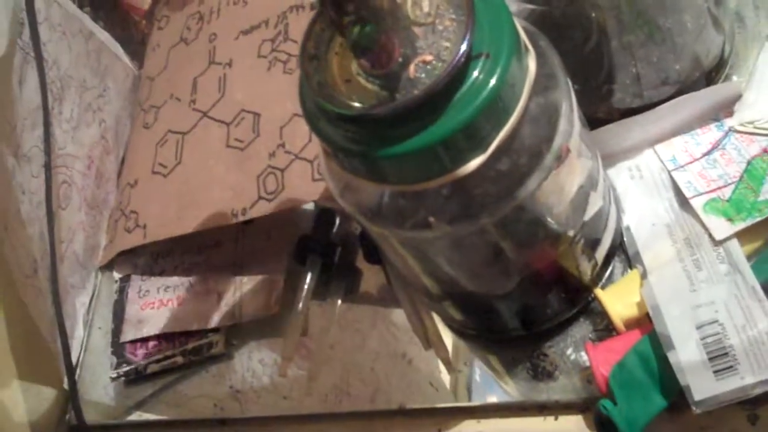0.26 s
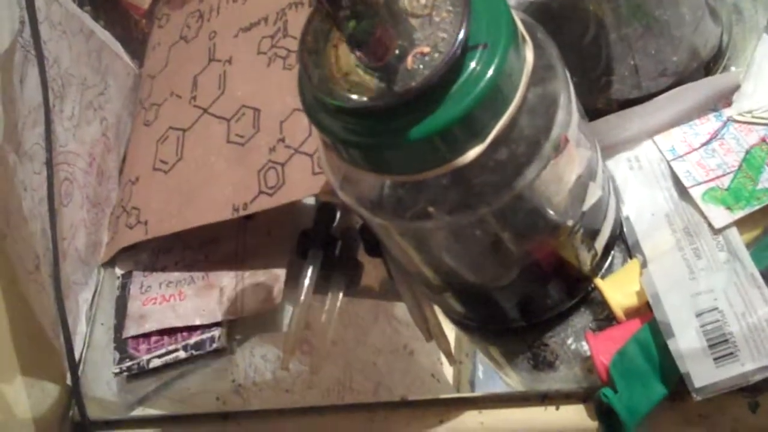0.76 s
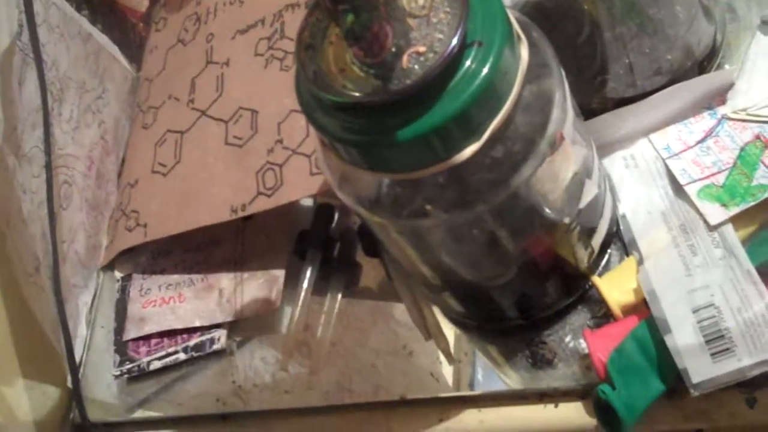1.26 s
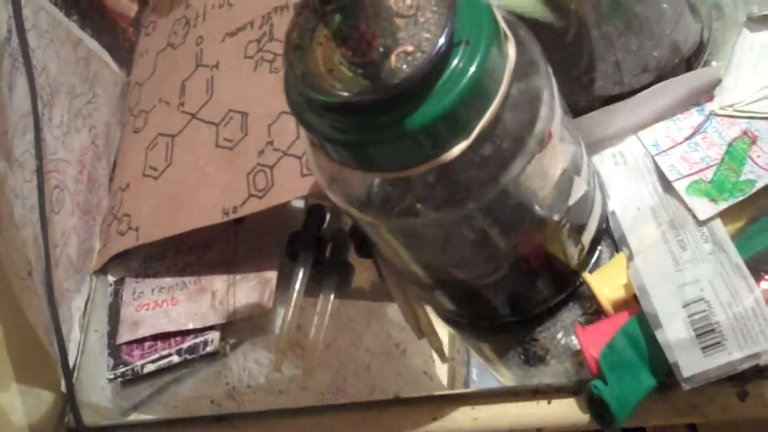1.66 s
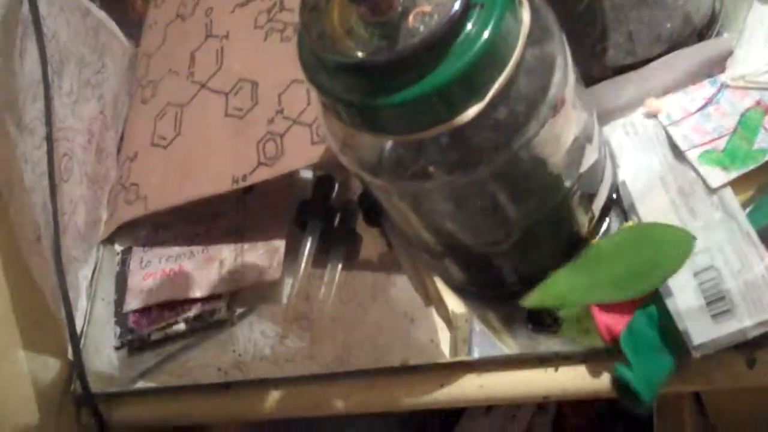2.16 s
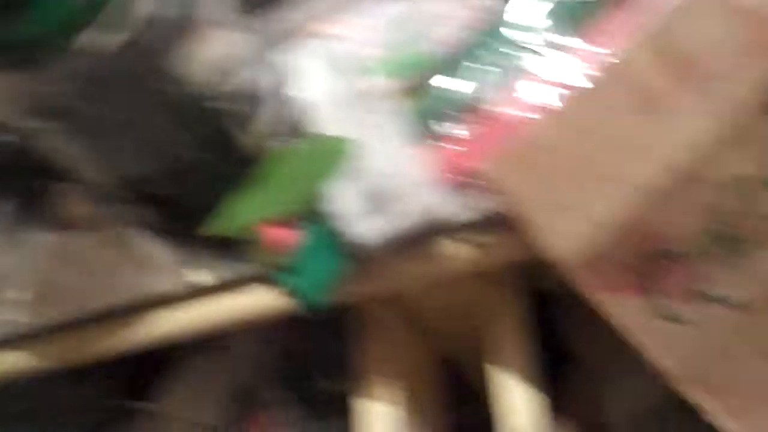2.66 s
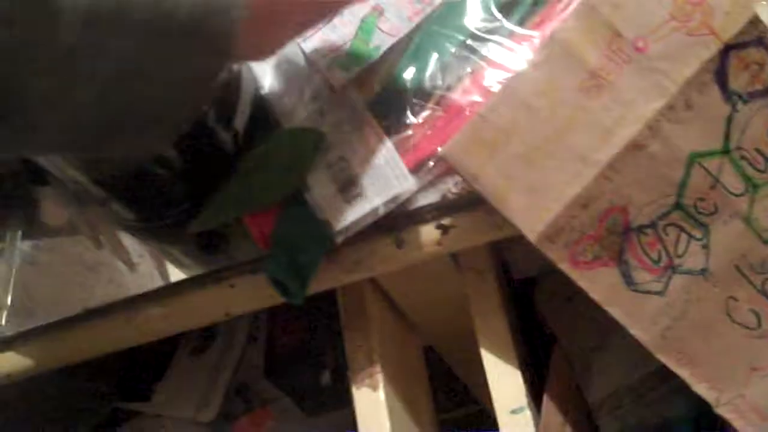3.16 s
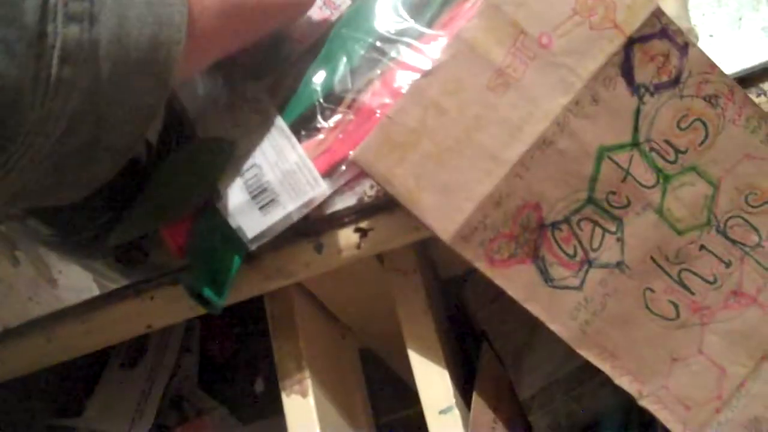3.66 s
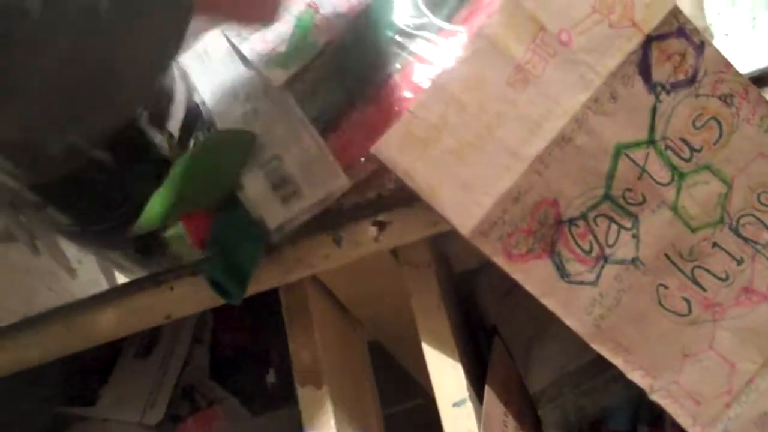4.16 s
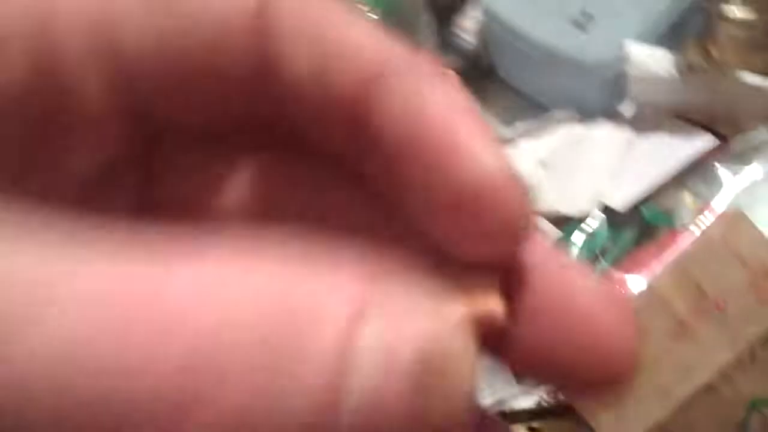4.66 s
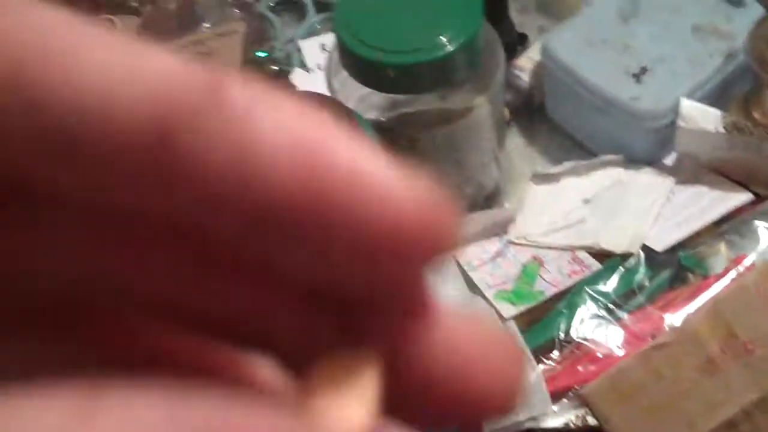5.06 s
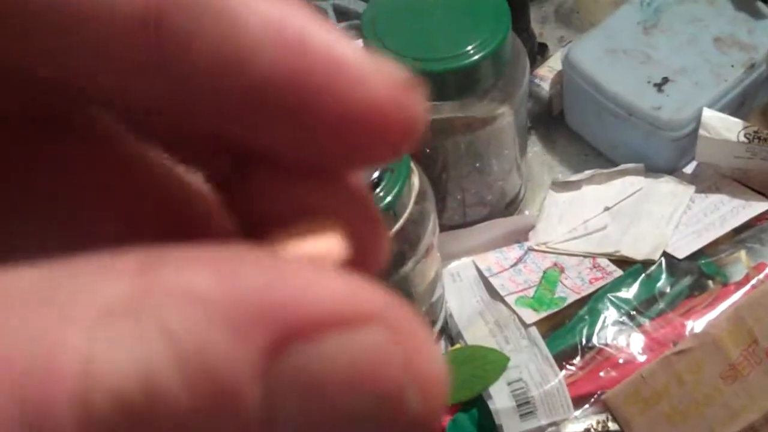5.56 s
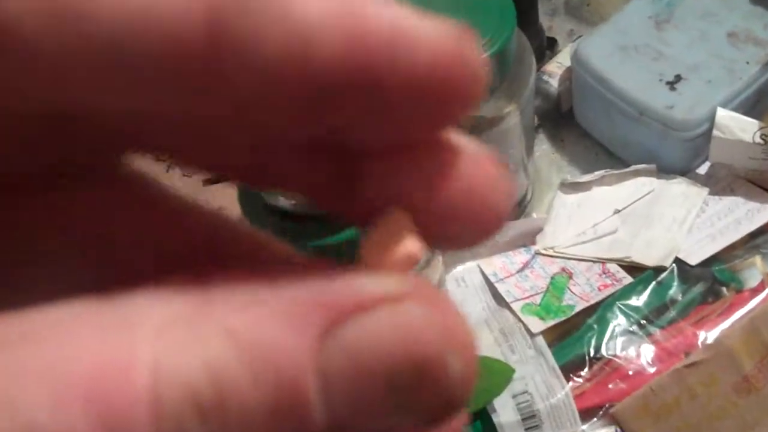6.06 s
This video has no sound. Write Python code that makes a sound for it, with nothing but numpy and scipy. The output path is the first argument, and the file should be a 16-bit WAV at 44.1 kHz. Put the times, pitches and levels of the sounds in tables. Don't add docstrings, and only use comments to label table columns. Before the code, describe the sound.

Glass jars clink and one clashes loudly, then scrapes and thuds onto a cluttered table, followed by plastic bag crackle and small finger clicks.

```python
import sys
import numpy as np
from scipy import signal
from scipy.fft import rfft, irfft
from scipy.io import wavfile
from scipy.ndimage import uniform_filter1d

SR = 44100
rng = np.random.default_rng(int(sys.argv[2]) if len(sys.argv) > 2 else 0)


def volts_from_db(level):
    exponent = np.asarray(level, float) / 20
    return 10 ** exponent


def unload_wav(signal):
    wavfile.write(
        sys.argv[1],
        SR,
        np.round(np.clip(np.atleast_2d(signal).T, -1, 1) * 32767).astype(np.int16),
    )


N = 278384

# f/Hz, level/dB per Hz
HISS = [(20, -7), (150, -1), (300, -3), (700, -5), (1700, -10.5), (2500, -11.5), (4000, -15), (5200, -12),
        (6100, -7.5), (6700, -7), (7500, -2.5), (8500, -12), (9800, -15), (14000, -18.5)]
# f/Hz, left-right level/dB; then f/Hz, left lead/rad
PORT_DB = [(60, -3), (110, 0), (200, 4.5), (360, 6.5), (660, 3), (1210, 2.5), (2210, 2), (4040, -3),
           (7370, 7), (13400, 9.5)]
PORT_LEAD = [(0, -0.5), (690, 0.14), (3100, -0.57), (3790, -0.83), (4310, 1.96), (5340, 1), (6200, 1.5),
             (7240, 1.0), (8270, 1.1), (9470, 5), (11200, -0.5), (12100, 0.5), (12700, 1), (13600, -4)]
# f/Hz, t60/s
ROOM = [(200, 0.04), (2000, 0.16), (8000, 0.14), (14000, 0.058)]

# peak t/s, rise/s, fall/s, lift/dB, weight/0-1
RUSTLES = [(.83, 0.045, 0.13, 14, 0.25), (1.68, 0.043, 0.23, 11.5, 0.2), (1.818, 0.072, 0.011, 9.5, 0),
           (1.828, 0.005, 0.32, 29, .1), (2.981, .3, 0.36, 8.5, 0.29), (3.336, 0.005, 0.043, 14.5, 0.28),
           (3.376, 0.042, 0.032, 13.5, 0.22), (3.36, .026, .12, 9.5, .2), (3.468, 0.11, 0.2, 19, 0.12),
           (3.561, 0.072, 0.11, 8, 0.2), (3.68, 0.067, 0.1, 18, 0.25), (3.84, 0.116, 0.11, 11, 0.02),
           (3.959, 0.0121, 0.085, 12, 0), (4.03, 0.05, 0.035, 2.5, 0), (4.08, 0.047, 0.21, -4.5, 0),
           (4.5, 0.23, 0.48, 8, 0.48), (6.3, 0.46, .11, 2, 0)]
# peak t/s, rise/s, fall/s, lift/dB, weight/0-1
SCRAPES = [
    (2.011, 0.0068, 0.063, 27.5, 0.35),
    (2.124, 0.0075, 0.072, 30.5, 0.06),
    (2.287, .004, 0.1, 27, 0.2),
    (2.41, 0.11, 0.19, 10.5, 0.26),
    (5.378, 0.013, 0.29, 10.5, 0.31),
]
# f/Hz; then the share of the lift in each, for light and heavy strokes
STIR_HZ = [300, 1900, 6500, 12000]
RUSTLE_SHARE = [0.16, 0.49, 0.93, .55]
SCRAPE_SHARE = [0.066, 1, 0.97, 0.26]
HEAVY_SHARE = [0.9, 0.85, .3, .3]

# t/s, level/dB, f/Hz, length/s
SQUEAKS = [(.53, -72, 1650, .09), (.86, -66, 120, .11), (1.32, -64, 540, .04), (1.84, -66, 125, .22),
           (6.03, -68, 1120, .07), (5.475, -65, 1150, .1), (5.385, -68, 810, .11), (5.385, -69, 1740, .17),
           (5.385, -72, 2800, .2), (5.39, -75, 2080, .3), (4.4, -73, 6000, .75), (5.35, -73, 6200, .95),
           (4.6, -80, 9500, 1.7)]
# t/s, peak level/dB, f/Hz, t60/s
BUMPS = [(.882, -51, 126, .07), (1.677, -49, 470, .035), (1.822, -34.5, 95, .05), (2.296, -29, 390, .028),
         (3.36, -49, 210, .19), (4.156, -51, 700, .03), (4.5, -61, 120, .05), (4.667, -48, 260, .015),
         (4.768, -57, 800, .02), (4.822, -51, 560, .025), (4.844, -49, 720, .08), (4.892, -55, 630, .03),
         (4.936, -56, 700, .04), (5.011, -57, 600, .02), (5.366, -39, 200, .02), (5.366, -41, 650, .015)]
# t/s, level/dB, f/Hz, relative width, t60/s
BOOMS = [
    (2.284, -39, 385, .35, .3),
    (2.29, -44, 250, .3, .55),
    (2.385, -54, 790, .2, .2),
    (2.445, -55, 790, .2, .15),
    (2.43, -54, 350, .3, .6),
    (5.39, -63, 290, .5, 1.6),
]
# t/s, level/dB, from f/Hz, to f/Hz, length/s
FLICKS = [(4.753, -53.5, 3090, 1600, 0.02), (5.036, -56, 3390, 2300, .014)]

# start t/s, end t/s, level/dB
CRACKLES = [(3.331, 3.39, -43.5), (3.409, 3.49, -46.5), (3.497, 3.59, -45), (3.641, 3.74, -48),
            (3.801, 3.9, -48.5), (3.95, 4.04, -51.5)]
# f/Hz, level/dB per Hz
TICK_COLOUR = [(200, -37.5), (500, -11.5), (1900, -8.5), (3000, -7), (5600, -4.5), (7500, -2), (9000, -7),
               (11000, -21), (15000, -18)]
# t/s, peak level/dB, ring f/Hz
CREASES = [(3.3844, -38, 5250), (3.5004, -31, 5770), (3.5084, -41, 5580), (3.5252, -41, 7300),
           (3.5674, -47, 7640), (3.5851, -46, 7260), (3.6662, -45, 7300), (3.6827, -44, 7300),
           (3.6963, -40, 7330), (3.7371, -48, 6870), (3.7544, -44, 7600), (3.77, -41, 5700),
           (3.7774, -44, 7340), (3.7884, -39.5, 7500), (3.8534, -40, 5850), (3.8713, -49, 6000),
           (3.8824, -50, 7370), (3.9134, -53, 6650), (3.9604, -48, 5590), (3.9754, -44, 7500),
           (3.9944, -45.5, 7390), (4.0063, -49, 7630), (4.0203, -46, 7380), (4.0384, -48.5, 7560)]
# t/s, peak level/dB, ring f/Hz
BAG_TICKS = [(3.3312, -32, 4330), (3.3403, -34.5, 6490), (3.3547, -28.5, 5000), (3.438, -27.5, 5900),
             (3.4705, -39, 5830), (3.4884, -27.5, 5600), (3.4909, -21, 6360), (3.5551, -28, 7100),
             (3.6333, -25, 5800), (3.537, -38, 5500), (3.625, -43, 8500), (3.711, -36, 7400),
             (3.6894, -37.5, 5520), (3.7242, -33.5, 7400), (3.8034, -38.5, 5420), (3.8141, -30.5, 3430),
             (3.8289, -30.5, 6420), (3.8401, -29.5, 7600), (3.8444, -37, 1700), (3.8614, -53, 7290),
             (3.9514, -46, 5200)]
# t/s, peak level/dB, ring f/Hz
FINGER_TICKS = [(5.1477, -31.5, 7260), (5.1514, -39, 6760), (5.1687, -28.5, 2670), (5.1733, -32.5, 7340),
                (5.1795, -30, 5770), (5.1834, -34, 3470), (5.1904, -49, 8370), (5.1944, -33, 7260),
                (5.2044, -38, 5930), (5.012, -49.5, 2388), (5.38, -52, 5200)]
# t/s, peak level/dB, ring f/Hz
TABLE_KNOCKS = [(1.885, -23, 1000), (1.91, -34, 2020), (2.2818, -11.5, 3500), (2.3165, -18, 6740),
                (2.4954, -31.5, 3480), (2.5344, -41, 4700), (4.1288, -42, 3554)]
# t/s, peak level/dB, ring f/Hz
RATTLE_TICKS = [(2.009, -27, 6500), (2.02, -26, 6500), (2.049, -34, 6500), (2.063, -35, 6950),
                (2.095, -35, 4990), (2.121, -19.5, 2040), (2.1274, -22.5, 5700), (2.137, -19.5, 4430),
                (2.2307, -43.5, 5850), (2.2958, -6, 4700), (2.3836, -25, 6800), (2.4363, -24, 7060),
                (2.438, -30, 2550), (2.386, -29, 2950), (2.2853, -17, 3500), (2.343, -33, 1800),
                (2.4707, -31, 3640), (2.4893, -31, 4790), (2.607, -48.5, 4410), (2.618, -47, 4400),
                (2.222, -46, 6800), (2.6403, -42, 4600)]
# t/s, peak level/dB, ring f/Hz
SNAPS = [(.6768, -47.5, 6700), (.8462, -27.5, 7800), (2.3872, -25.5, 8300), (3.4925, -24.5, 7500),
         (3.5575, -32.5, 6400), (3.441, -34, 7500), (3.568, -44, 10500), (3.8305, -34, 7500),
         (1.8225, -12, 2700), (1.8245, -11, 5600), (2.3845, -30, 12500), (2.4368, -33, 9800),
         (2.297, -20, 12500), (1.2605, -33, 8500), (.8415, -30, 12000), (1.261, -36, 13000)]
# t/s, peak level/dB, ring f/Hz
GLASS_TICKS = [(.0741, -45, 7150), (.31, -45, 7300), (.6906, -47, 7160), (.8409, -21, 2983),
               (.9875, -45, 3700), (1.1647, -43.5, 8000), (1.2568, -37, 3800), (1.2598, -33, 12500),
               (1.718, -35, 3600), (1.7314, -36.5, 3800), (1.75, -45, 8000), (1.7814, -23, 11300),
               (1.7878, -15.5, 4700), (1.8218, -6, 5200), (1.8224, -5, 7400), (1.956, -29.5, 5300),
               (.922, -43, 6500)]

# f/Hz, level/dB, t60/s, left-right level/dB, left lead/rad
HELD = [(3032, 0, 0.102, 1, -0.3), (5416, -18, 0.137, 8, 1.3), (5394, -13, 0.153, 10, 1.3),
        (7838, -2, 0.11, 15, 1.2), (9954, -12, 0.101, 14, -1.1), (10710, -12, 0.077, 20, -0.3),
        (11160, -23, 0.125, 2, -0.1), (13110, -37, 0.101, 20, -0.5), (13850, -34, 0.098, 20, 1.3)]
TAPPED = [(3036, -9, .085, 3, -.5), (5394, -9, .15, 2, 1.6), (5427, -11, .12, 2, 1.6),
          (7840, -3.5, .15, 12, 1.2), (12390, -10, .035, 12, 0), (13630, -12, .03, 12, 0)]
NUDGED = [(3022, -9, 0.689, 0, -0.3), (4780, -7, 1.0, 0, 0.8), (5394, -12, 0.885, -17, 2.4),
          (5780, -16, 0.153, -2, 0.9), (6420, -20, 1.0, -4, 1.0), (6755, -9, 1.0, 12, 0.5),
          (7655, -21, 0.108, 16, -2.2), (7806, 0, 0.088, 9, 1.1), (9943, -11, 0.12, 7, -0.9),
          (10680, -16, 1.0, 10, 0.2), (11050, -4, 0.345, 9, -2.1), (11245, -21, 1.0, 2, -1.8)]
CLASHED = [(3020, -20, .62, 0, -.2), (3148, -16, .49, -7, 2.1), (4183, -24, .55, 5, .6),
           (4217, -12.5, .55, 9, -2), (4428, -22, .09, 2, 0), (5393, -8, .17, -1, 1.5),
           (5410, -24, .2, -2, 1.5), (7810, -20, .17, 16, 2.3), (8500, 5, .017, 8, -.9),
           (8549, -11, .14, 6, -.8), (6200, -11, .035, 2, 1.8), (9943, -40, .18, 15, -.3),
           (12530, -23, .07, 19, -2.8), (4200, -4, .035, 8, -1)]
NEIGHBOUR = [(4757, -12, .25, -4, -.7), (4781, -28, .9, 0, -.7), (5790, -36, .23, -5, .1),
             (6403, -28, .4, 1, 1.1), (6748, -25, .3, 4, 1.5), (10660, -36, .3, 14, -2),
             (10748, -31, .36, 14, -1), (11053, -30, .25, 12, -.5), (11244, -25, .26, 14, -1.9),
             (13845, -22, .1, 14, -1.5), (13700, -23, .06, 13, -1)]
GRAZED = [(3050, 0, .25, -1.5, -.3), (3140, -0.5, .5, -6, 2.3), (4780, -10.5, .6, -4, -0.54),
          (5400, -5, .35, -2, 1.7), (6420, -14, .3, 0.5, 1.1), (7700, -3.5, .35, 12.5, 1.2),
          (8393, -8, .2, 8, -.4), (10710, -13.5, .12, 14, -.3)]
SET_DOWN = [(4790, -5.5, 0.93, -8, 0.5), (6070, 7, 0.11, -6, -0.5), (6360, -12.5, 0.77, -8, -7),
            (6800, -5.5, 0.49, 5, -1), (10750, -14.5, 0.83, 12, -2), (11250, -15, 0.36, 24, -4)]
# f/Hz, level/dB, t60/s, left-right level/dB, left lead/rad
RIM = [(7490, 0, 0.032, 14, 1.2)]
BASE = [(4735, 0, 0.0124, -2, .5), (3970, -6, 0.021, -2, 0.65)]
CAP = [(1990, 0, 0.025, 2, -.3)]
TILTED = [(4748, 0, 1, -6, -.7)]
SHOULDER = [(9959, 0, .09, 14, -1.1), (11180, -2, .12, 10, -.3)]
TWIN = [(8583, 0, .14, 8, -.5)]

# t/s, strength level/dB, brightness/dB per octave, ring length factor, stopped after/s
HELD_BLOWS = [
    (0.834, -41, 0, 1.25, 0.016),
    (0.8433, -25.5, 0.4, 1.21, .3),
    (1.321, -50.5, 3, 0.94, .2),
    (1.782, -32.5, 1.5, 1.01, .2),
    (3.971, -52.5, -16.5, 1.22, 0.25),
]
TAPPED_BLOWS = [(.9895, -41, -1.5, .8, .3), (1.2585, -29.5, 0.1, 1.01, .045)]
NUDGED_BLOWS = [(1.789, -21, 0.11, 1.1, .03)]
CLASHED_BLOWS = [
    (1.8221, 0.1, 0.1, 0.96, 0.28),
]
NEIGHBOUR_BLOWS = [
    (1.8222, -1.5, 1.42, 1.01, 0.18),
    (2.021, -32.5, -8.5, 2.17, 0.098),
]
GRAZED_BLOWS = [(1.657, -53.5, -2, .8, .2), (1.695, -56.5, 4, 1, .2), (1.718, -48.5, 2.4, 1.1, .1),
                (1.733, -50, 0.97, 1.1, .1)]
SET_DOWN_BLOWS = [
    (2.2967, -33.5, 0.1, 0.98, 0.25),
]
RIM_BLOWS = [(1.2618, -21, 0, 0.9, .1), (.993, -39, 0, 1, .1)]
BASE_BLOWS = [(2.2964, -5.5, 0, 1, .1)]
CAP_BLOWS = [(.3102, -44, 0, 0.82, .1)]
TILTED_BLOWS = [(1.938, -29, 0, 1, .075)]
SHOULDER_BLOWS = [(1.26, -44, 0, 1, .1), (.9895, -56, 0, 1, .1)]
TWIN_BLOWS = [(1.82217, -11.5, 0, 1, .28)]


def evened(x):
    return x / np.sqrt(np.mean(x ** 2) + 1e-20)


def read(points, hz):
    f, value = np.transpose(points)
    return np.interp(np.log(hz + 1), np.log(f + 1), value)


def add(mix, s, sound):
    part = mix[:, round(s * SR):][:, :sound.shape[1]]
    part += sound[:, :part.shape[1]]


def panned(db):
    pair = volts_from_db(np.array([[db / 2], [-db / 2]]))
    return pair / np.sqrt(np.mean(pair ** 2))


def band(x, hz, width):
    return signal.lfilter(*signal.iirpeak(np.clip(hz, 30, 15000), 1 / max(width, .02), SR), x)


def causal(db):
    log_gain = np.log(volts_from_db(np.concatenate([db, db[-2:0:-1]])))
    return volts_from_db(db) * np.exp(-1j * signal.hilbert(log_gain).imag[:len(db)])


def ports(hz):
    return volts_from_db(-read(PORT_DB, hz)) * np.exp(-1j * read(PORT_LEAD, hz))


def room(x):
    taps = np.zeros((2, SR // 2))
    at = np.arange(100, SR // 2 - 20, 20)
    at = at + rng.integers(0, 20, (2, len(at)))
    np.put_along_axis(taps, at, rng.choice([-1., 1.], at.shape), 1)
    hz, t, z = signal.stft(taps, SR, nperseg=128)
    tail = signal.istft(z * volts_from_db(-60 * t / read(ROOM, hz)[:, None]), SR, nperseg=128)[1]
    return signal.fftconvolve(x, tail / np.linalg.norm(tail[0]), axes=1)[:, :N]


def stirring(t, hz):
    lift = np.zeros((len(STIR_HZ), len(t)))
    for share, strokes in ((RUSTLE_SHARE, RUSTLES), (SCRAPE_SHARE, SCRAPES)):
        for s, rise, fall, db, weight in strokes:
            colour = (1 - weight) * np.array(share) + weight * np.array(HEAVY_SHARE)
            lift += db * np.outer(colour, np.interp(t, [s - rise, s, s + fall], [0, 1, 0]))
    weights = np.array([read(list(zip(STIR_HZ, row)), hz) for row in np.eye(len(STIR_HZ))])
    return weights.T @ lift * np.clip(hz / 250, 0, 1)[:, None]


def background():
    hiss_db = -62
    frames, hz = N // 64 + 9, np.fft.rfftfreq(256, 1 / SR)
    lift_db = stirring(np.arange(frames) * 64 / SR, hz)
    busy = np.clip(lift_db / 12, 0, 1)
    a, b, c, d, patches = rng.standard_normal((frames, len(hz), 5)).T
    flicker = evened(uniform_filter1d(rng.standard_normal(frames), 3))
    patches = evened(uniform_filter1d(uniform_filter1d(patches, 5, 0), 20, 1))
    same = np.clip(0.29 * busy, 0, 1)
    left = a + 1j * b
    right = ports(hz)[:, None] * (same * left + np.sqrt(1 - same ** 2) * (c + 1j * d))
    pair = np.array([left, right])
    floor_db = read(HISS, hz)[:, None]
    quiet = signal.istft(pair * volts_from_db(floor_db), nperseg=256, noverlap=192)[1]
    ragged_db = (1.05 + 4.1 * busy) * patches + 0.5 * busy * flicker
    stirred = signal.istft(pair * volts_from_db(floor_db + lift_db + ragged_db), nperseg=256, noverlap=192)[1]
    return volts_from_db(hiss_db) * stirred[:, :N] / quiet.std()


def squeaks():
    out = np.zeros((2, N))
    for s, db, hz, length in SQUEAKS:
        noise = rng.standard_normal((2, round(length * SR)))
        tone = band(noise[0] + .4 * noise, hz, 0.048 + 55 / hz)
        tone = evened(band(tone, hz, 0.099 + 55 / hz))
        add(out, s, volts_from_db(db) * tone * signal.windows.tukey(noise.shape[1], .25))
    return out


def bumps():
    out, t = np.zeros((2, N)), np.arange(6000) / SR
    for s, db, hz, t60 in BUMPS:
        push = (t == 0) + 0.3 * rng.standard_normal(len(t)) * volts_from_db(-60 * t / t60)
        push = band(band(push, hz, 1.1), hz, 1.3)
        add(out, s + .001, volts_from_db(db) * panned(1.5) * push / abs(push).max())
    return out


def booms():
    out, t = np.zeros((2, N)), np.arange(24000) / SR
    for s, db, hz, width, t60 in BOOMS:
        noise = rng.standard_normal((2, len(t)))
        hum = evened(band(band(noise[0] + .35 * noise, hz, width), hz, .7))
        add(out, s, volts_from_db(db - 60 * t / t60) * np.minimum(t / .004, 1) * hum)
    return out


def flicks():
    out = np.zeros((2, N))
    for s, db, from_hz, to_hz, length in FLICKS:
        u = np.arange(round(length * SR)) / (length * SR)
        hz = (from_hz + (to_hz - from_hz) * u) * (1 + .15 * rng.standard_normal(len(u)))
        swell = volts_from_db(db - 9.9 * u) * np.sin(np.pi * u ** .5)
        add(out, s, panned(2.5) * swell * np.sin(2 * np.pi * np.cumsum(hz) / SR))
    return out


def crackle():
    pops_per_s, spread_db, tilt_db = 500, 3.5, 3.5
    t, hz = np.arange(N) / SR, np.fft.rfftfreq(256, 1 / SR)
    chance, size, side = rng.random((N, 3)).T
    level = sum(volts_from_db(db) * (t > start) * (t < end) for start, end, db in CRACKLES)
    pops = level * (chance < pops_per_s / SR) * volts_from_db(-spread_db * np.log(size + 0.0101)) * np.sign(side - .5)
    colour = causal(read(TICK_COLOUR, hz) + tilt_db * np.log2(hz / 6000 + .05))
    click = irfft(colour * np.array([np.ones(len(hz)), ports(hz)]))
    click = np.roll(click, 30, axis=1)
    return signal.oaconvolve(pops[None], click / abs(click.mean(0)).max(), axes=1)[:, :N]


def ticks(rows, thud_db, thud_loss, top_db, top_loss, snap_t60):
    out, t = np.zeros((2, N)), np.arange(3000) / SR
    hz_axis = np.fft.rfftfreq(len(t), 1 / SR)
    pair = np.array([np.ones(len(hz_axis)), ports(hz_axis)])
    top = np.clip((hz_axis - 8500) / 2000, 0, 1)
    low = np.clip(np.log2(2600 / (hz_axis + 1)) * 2, 0, 1)
    late, lead_in = .0004, 30
    fade_out = signal.windows.tukey(2 * len(t), .5)[len(t):]
    fade = volts_from_db(-60 * t / snap_t60) + volts_from_db(-20 - 60 * t / 0.07)
    for s, db, hz in rows:
        own_thud_db = thud_db - thud_loss * (db + 35.0)
        own_top_db = top_db - top_loss * (db + 32.5)
        shared, own, lumps = rng.standard_normal((3, len(t)))
        crunch = volts_from_db(3.2 * evened(uniform_filter1d(lumps, 20))) * fade
        impulse = 3 * np.exp(-t / .00005) * np.sign(shared[0])
        blow = crunch * np.array([shared, 0.42 * shared + .5 * own]) + impulse
        ripple = uniform_filter1d(uniform_filter1d(lumps[:len(hz_axis)], 40), 40)
        away = np.log(hz_axis / hz + 1e-9)
        focus_db = 9 * np.exp(-(away / 0.22) ** 2) + 5.0 * np.exp(-(away / 0.032) ** 2)
        focus_db -= 2.4 * abs(np.log2(np.clip(hz_axis / hz, .1, 1)))
        colour_db = read(TICK_COLOUR, hz_axis) + 1.2 * evened(ripple) + focus_db
        colour_db += low * .5 * (own_thud_db + 30.5) + top * (own_top_db + 31.5)
        spectrum = rfft(np.roll(blow, lead_in, axis=1)) * causal(colour_db) * pair
        bright = irfft(spectrum, len(t)) * fade_out
        push = np.roll(blow[0] + 1.2 * shared * volts_from_db(-60 * t / 0.075), lead_in)
        thud = band(band(push, 350, 1.5), 720, 2.9)
        sound = bright / abs(bright.mean(0)).max() + volts_from_db(own_thud_db + 4.0) * thud / abs(thud).max()
        add(out, s + late, volts_from_db(db + 1.3) * sound)
    return out


def clutter():
    return (ticks(CREASES, thud_db=-40, thud_loss=.1, top_db=-26, top_loss=.1, snap_t60=.004)
            + ticks(BAG_TICKS, thud_db=-38, thud_loss=.97, top_db=-26, top_loss=-.33, snap_t60=.006)
            + ticks(FINGER_TICKS, thud_db=-42.5, thud_loss=2.16, top_db=-32.5, top_loss=.1, snap_t60=.0121)
            + ticks(TABLE_KNOCKS, thud_db=-14, thud_loss=.14, top_db=-27.5, top_loss=.1, snap_t60=.0092)
            + ticks(RATTLE_TICKS, thud_db=-27.5, thud_loss=.26, top_db=-32, top_loss=.2, snap_t60=.014)
            + ticks(GLASS_TICKS, thud_db=-34.5, thud_loss=.21, top_db=-21.5, top_loss=.11, snap_t60=.023))


def snaps():
    return ticks(SNAPS, thud_db=-42, thud_loss=.1, top_db=-20, top_loss=.1, snap_t60=.005)


def ring(modes, blows):
    hard_rise_s, softening = .0005, .36
    sway_depth_db = 1.8
    out = np.zeros((2, N))
    for s, db, tilt_db, length, stop in blows:
        t = np.arange(round((stop + .12) * SR)) / SR
        rise = 1 - np.exp(-t / (hard_rise_s * volts_from_db(-softening * db)))
        shape = rise * volts_from_db(-450 * np.maximum(t - stop, 0))
        for hz, mode_db, t60, pan_db, lead in modes:
            turn = 2 * np.pi * hz * t - np.array([[0], [lead]])
            rate, start = rng.random((2, 2, 1))
            sway_db = sway_depth_db * np.sin(2 * np.pi * ((8 + 25 * rate) * t + start))
            bright_db = tilt_db * np.log2(hz / 3000)
            level = volts_from_db(db + mode_db + sway_db + bright_db - 60 * t / (t60 * length))
            add(out, s, panned(pan_db) * shape * level * np.sin(turn))
    return out


def chinks():
    return (ring(RIM, RIM_BLOWS) + ring(BASE, BASE_BLOWS) + ring(CAP, CAP_BLOWS)
            + ring(TILTED, TILTED_BLOWS) + ring(SHOULDER, SHOULDER_BLOWS) + ring(TWIN, TWIN_BLOWS))


def jars():
    return (ring(HELD, HELD_BLOWS) + ring(TAPPED, TAPPED_BLOWS) + ring(NUDGED, NUDGED_BLOWS)
            + ring(CLASHED, CLASHED_BLOWS) + ring(NEIGHBOUR, NEIGHBOUR_BLOWS)
            + ring(GRAZED, GRAZED_BLOWS) + ring(SET_DOWN, SET_DOWN_BLOWS))


def scene():
    glass = jars()
    knocks = clutter() + bumps() + booms() + flicks() + squeaks()
    small = chinks() + snaps() + crackle()
    tail = volts_from_db(-13.5) * room(knocks + volts_from_db(-11.0) * glass) + volts_from_db(-15.5) * room(small)
    return background() + knocks + small + glass + tail


def roll_off(x):
    return signal.sosfilt(signal.butter(12, 14040, fs=SR, output="sos"), x)


def record(dry):
    mix = np.clip(dry, -1, 1)
    return roll_off(mix)


dry = scene()
out = record(dry)
unload_wav(out)
```